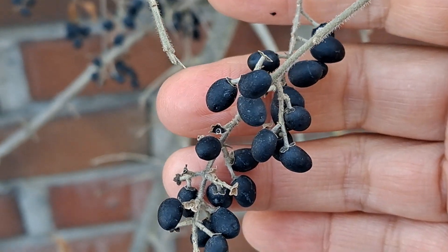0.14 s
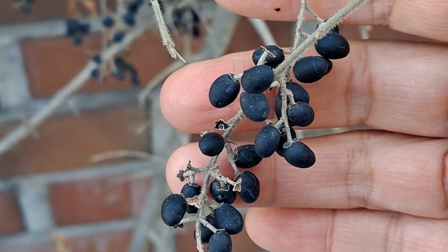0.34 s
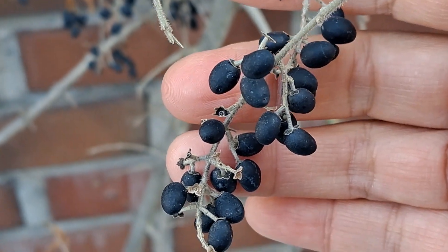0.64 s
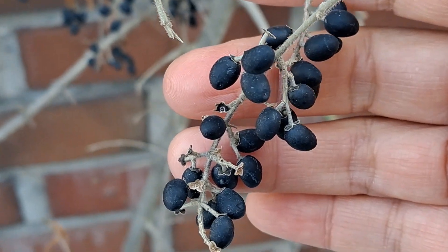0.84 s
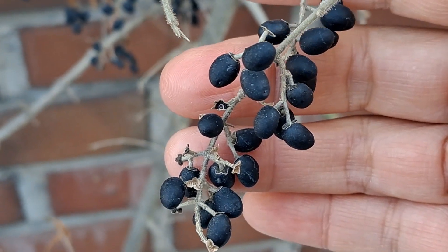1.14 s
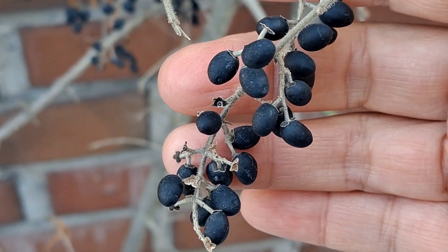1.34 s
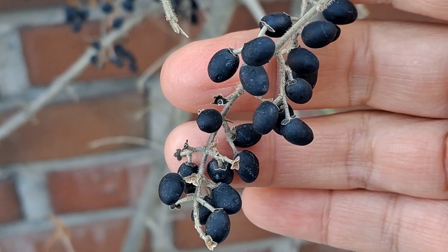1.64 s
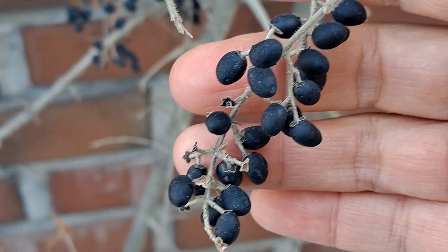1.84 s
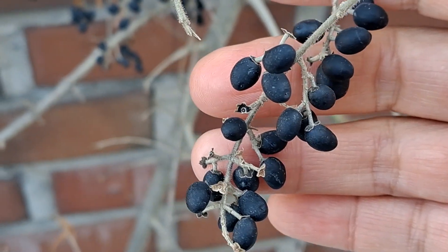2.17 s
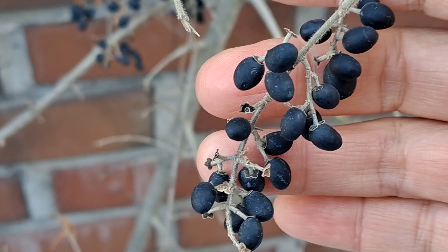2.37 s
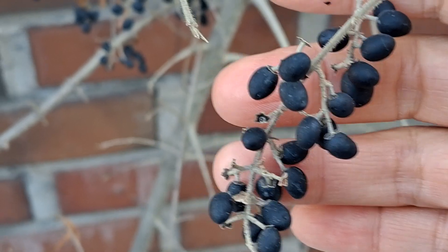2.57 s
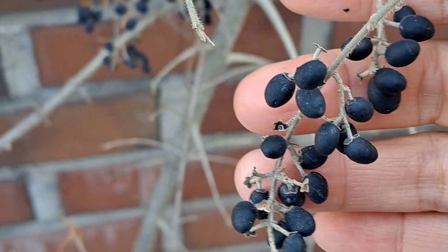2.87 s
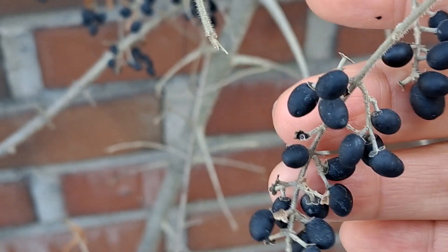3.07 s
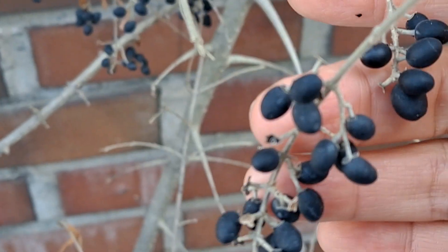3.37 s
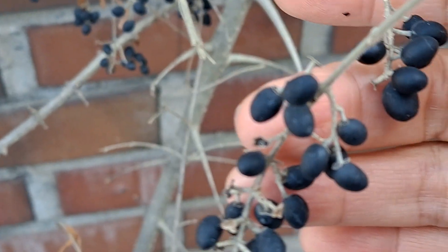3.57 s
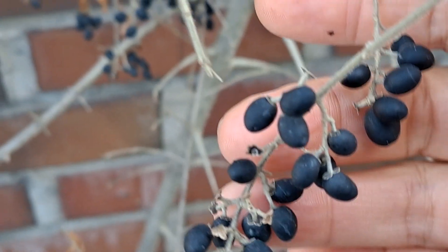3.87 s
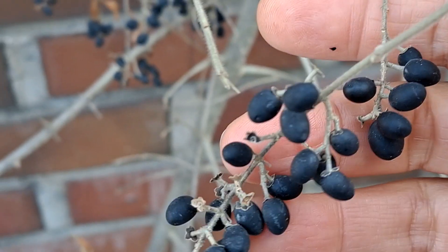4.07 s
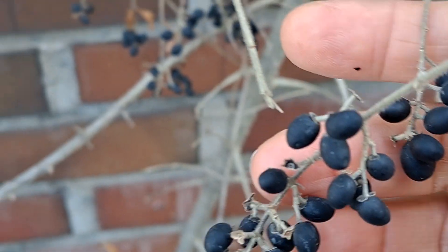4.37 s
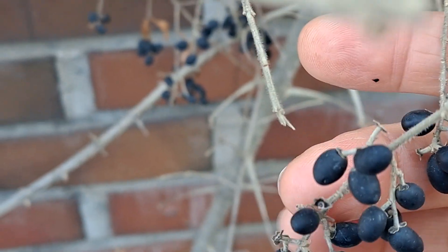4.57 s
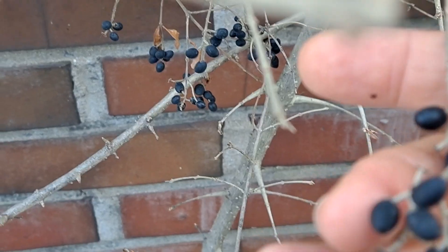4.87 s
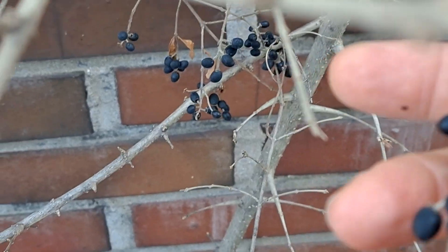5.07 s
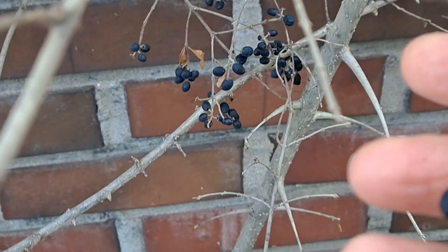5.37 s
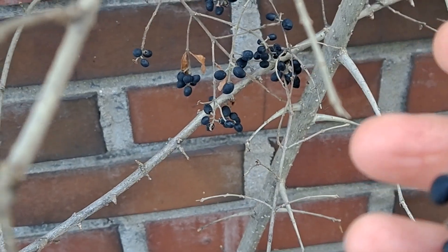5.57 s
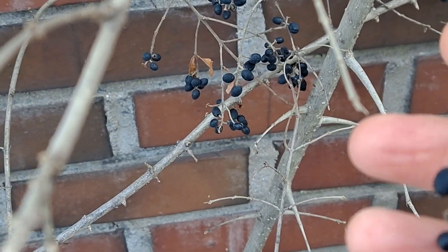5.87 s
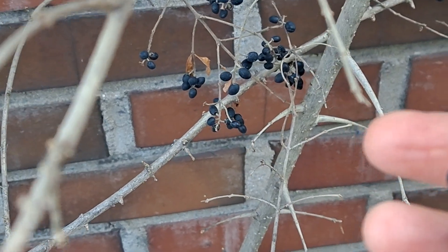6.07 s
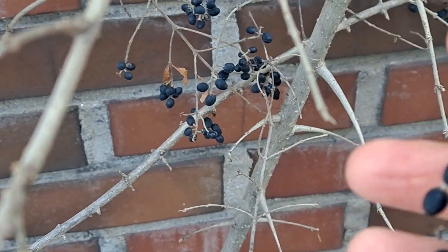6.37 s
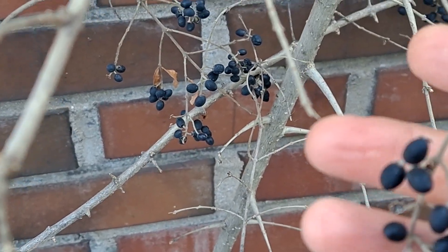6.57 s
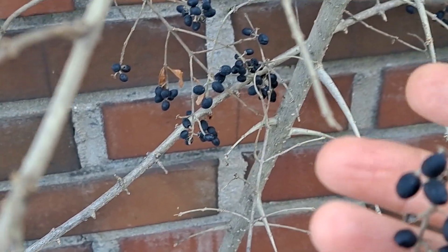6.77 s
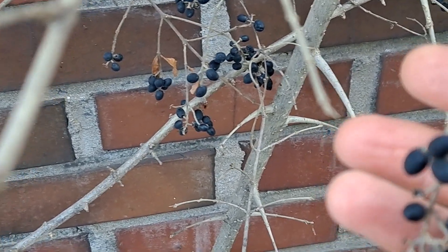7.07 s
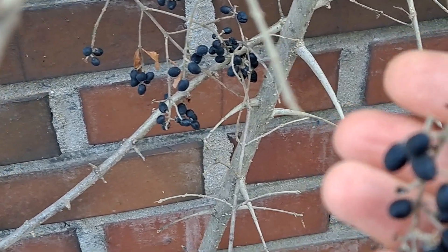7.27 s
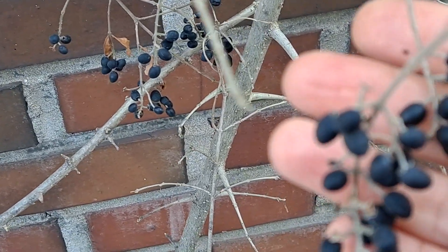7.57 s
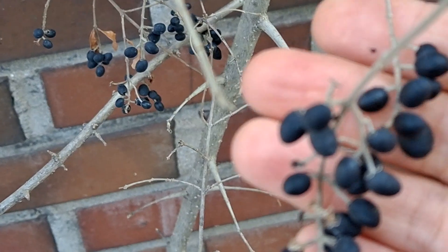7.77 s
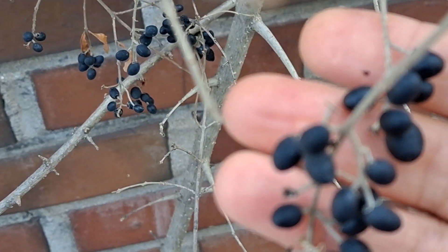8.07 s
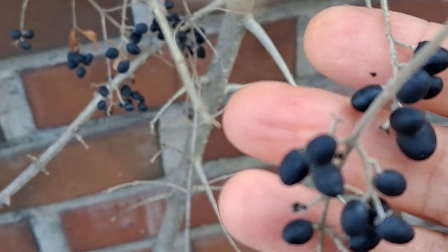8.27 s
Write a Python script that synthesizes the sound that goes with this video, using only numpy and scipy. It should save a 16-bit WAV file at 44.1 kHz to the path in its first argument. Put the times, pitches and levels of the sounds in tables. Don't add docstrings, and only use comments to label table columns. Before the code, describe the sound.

Low, steady rumble and hum of distant road traffic outdoors, with very faint high brake squeals and a few tiny dry twig ticks close by.

```python
import sys
import numpy as np
from scipy import signal
from scipy.fft import rfft, irfft, next_fast_len
from scipy.io import wavfile
from scipy.ndimage import uniform_filter1d

SR = 44100
rng = np.random.default_rng(int(sys.argv[2]) if len(sys.argv) > 2 else 0)


def boost_factor(decibels):
    exponent = np.asarray(decibels, float) / 20
    return 10 ** exponent


def dump(signal):
    limited = np.clip(np.atleast_2d(signal).T, -1, 1)
    pcm = np.round(limited * 32767).astype(np.int16)
    wavfile.write(sys.argv[1], SR, pcm)


N = 371763


def rms_one(x):
    return x / np.sqrt(np.mean(x ** 2) + 1e-30)


def in_time(rows):
    s, db = np.transpose(rows)
    return np.interp(np.arange(N) / SR, s, db)


def at_hz(points, hz):
    points = np.array(points)
    return np.interp(np.log(hz + 1), np.log(points[:, 0]), points[:, 1])


def drift(rate, size=N):
    points = 1.2 * rng.standard_normal(1700)
    return np.interp(np.arange(size) / SR * rate, np.arange(len(points)), points)


def pan(x, left_db):
    gains = boost_factor(np.array([[left_db / 2], [-left_db / 2]]))
    return x * gains * 2 / gains.sum()


def add(out, start, sound):
    at = round(start * SR)
    out[:, at:at + sound.shape[1]] += sound[:, :N - at]


def colour(x, points, shares):
    size = next_fast_len(N, True)
    curve_db = at_hz(points, np.arange(size // 2 + 1) * SR / size)
    return irfft(rfft(x, size) * boost_factor(np.outer(shares, curve_db)), size)[:, :N]


def field(spectrum, alike, lag):
    size = next_fast_len(N, True)
    hz = np.arange(size // 2 + 1) * SR / size
    real, imaginary = rng.standard_normal((2, 2, len(hz)))
    left, own = real + 1j * imaginary
    late_left = left * np.exp(-2j * np.pi * hz * lag / SR)
    right = alike * late_left + np.sqrt(1 - alike ** 2) * own
    inside = (hz > spectrum[0][0]) & (hz < spectrum[-1][0])
    return rms_one(irfft(np.array([left, right]) * boost_factor(at_hz(spectrum, hz)) * inside, size)[:, :N])


# f/Hz, level/dB per Hz
LEAF_SPECTRUM = [(1710, -24), (2900, -6), (3150, -2.5), (3510, -13), (4300, -13.5), (5000, -10),
                 (6000, -13), (8900, -12.5), (9300, -15), (10700, -18.5), (11500, -15), (12800, -15.5),
                 (13500, -13.5), (15800, -11.5)]
# t/s, level/dB
BREEZE = [(0.0, -82.5), (1.2, -82), (3.4, -81.5), (4.0, -82), (4.7, -77), (5.6, -79.5), (7.8, -81),
          (8.43, -82.5)]


def leaves():
    level_db = in_time(BREEZE) + 6.0 + 0.5 * drift(9.3)
    return boost_factor(level_db) * field(LEAF_SPECTRUM, alike=0.057, lag=22)


# t/s, level/dB
FLOW = [(0.0, -38.5), (0.9, -38.5), (1.6, -39.5), (2.3, -38), (3.3, -38), (4.1, -37.5), (4.8, -38.5),
        (5.4, -37.5), (5.95, -38), (7.3, -38.5), (7.7, -39.5), (8.43, -38.5)]


def traffic_swing():
    flow_db = in_time(FLOW)
    return flow_db - flow_db.mean()


# f/Hz, level/dB per Hz
RUMBLE = [(13, -50), (22, -27.5), (35, -1), (48, 1.5), (63, 2.5), (86, -5.5), (110, -7.5), (140, -27),
          (240, -120)]
# t/s, level/dB of the swell
AXLES = [(0.91, 7), (1.29, 6), (1.59, 7), (2.02, 3), (2.32, 7.5), (3.12, 4), (3.45, 6), (4.37, 4),
         (4.86, 1.5), (5.96, 2), (6.24, 8), (6.9, -2.5), (7.4, 5), (7.86, 8), (8.41, 2.5)]


def rumble(swing_db):
    t = np.arange(N) / SR
    half_width_s = 0.065
    axles_db = sum(db * np.exp(-0.5 * ((t - s) / half_width_s) ** 2) for s, db in AXLES)
    return boost_factor(-42.5 + 0.8 * swing_db + axles_db) * field(RUMBLE, alike=1.0, lag=22)


# f/Hz, level/dB per Hz
DRONE = [(47, -35.5), (80, -2.5), (132, 1.5), (183, -4.5), (253, -5.5), (285, -5), (318, -5), (374, -10.5),
         (449, -14), (483, -16.5), (700, -22.5), (910, -57), (1540, -120)]


def drone(swing_db):
    return boost_factor(-40 + swing_db) * field(DRONE, alike=0.89, lag=5.9)


# f/Hz, level/dB per Hz
TYRES = [(220, -36), (380, -3.5), (448, -3.5), (477, -3), (678, -7.5), (887, -2), (1340, -10.5),
         (1720, -15), (2010, -19.5), (2770, -34), (4500, -52), (5850, -70), (9900, -120)]


def tyre_roar(swing_db):
    level_db = -46.5 + 0.9 * swing_db + 0.42 * drift(6.0)
    return boost_factor(level_db) * field(TYRES, alike=0.36, lag=22)


def engine_tone(rows, wobble_hz, flutter_db, lag):
    out = np.zeros((2, N))
    s, hz, db = np.transpose(rows)
    t = np.arange(s[0], s[-1], 1 / SR)
    hz = uniform_filter1d(np.interp(t, s, hz), round(0.15 * SR))
    fade = np.clip(np.minimum(t - t[0] + 0.024, t[-1] + 0.016 - t) / 0.17, 0, 1)
    phase = 2 * np.pi * np.cumsum(hz + wobble_hz * drift(9.0, size=len(t))) / SR
    level = np.sqrt(2) * fade * boost_factor(np.interp(t, s, db) + flutter_db * drift(7.0, size=len(t)))
    right_phase = phase - 2 * np.pi * hz * lag / SR
    add(out, t[0], level * np.sin([phase, right_phase]))
    return out


# t/s, f/Hz, level/dB
IDLE = [(0.0, 52.5, -36), (0.42, 53.1, -39.5), (2.13, 51.1, -43.5), (2.58, 57.62, -48.5), (3.87, 53, -39.5),
        (4.13, 58.83, -43.5), (4.84, 51.0, -40.5), (6.15, 50.9, -46.5), (7.18, 53.15, -40),
        (7.35, 57.3, -39.5), (7.93, 53.86, -58), (8.43, 58.9, -35)]
LORRY = [(0.0, 133, -53), (0.7, 136, -45), (1.1, 134, -46.5), (1.55, 133, -42), (2.3, 135, -47),
         (2.9, 132, -49.5), (3.4, 134, -45), (3.9, 130, -51), (4.3, 134, -44.5), (4.8, 122, -40),
         (5.15, 130, -56), (5.65, 124, -44.5), (6.0, 140, -44), (6.4, 140, -53), (6.85, 132, -47),
         (7.2, 134, -49), (7.7, 130, -47.5), (8.43, 132, -46)]
EARLY_CAR = [(0.0, 232, -49.5), (0.6, 220, -48.5), (1.3, 214.8, -48.5), (1.87, 211, -51), (2.2, 210, -49)]
PASSING_CAR = [(2.1, 245, -60), (2.399, 256, -45), (2.899, 262, -50.5), (3.4, 269, -46), (3.75, 265, -47.5),
               (3.9, 261, -51), (4.05, 260, -42), (4.7, 250, -50.5), (5.3, 244, -45.5), (5.85, 241, -46),
               (6.1, 234.4, -49.5), (6.901, 226, -43.5), (7.6, 218, -53.5), (8.43, 211, -48.5)]
VAN = [(3.8, 318, -56), (4.2, 314, -52), (4.6, 322, -52), (4.9, 320, -59), (5.1, 326, -52), (5.3, 322, -47),
       (5.7, 313, -48), (6.1, 308, -47), (6.5, 312.8, -61)]
WHINE = [(1.15, 454, -74), (1.29, 447, -46.5), (1.45, 451, -78), (1.8, 449.6, -50.5), (2.2, 450, -67.5),
         (2.47, 447, -50), (2.77, 451, -50.5), (3.1, 460, -64)]


def engines():
    out = boost_factor(-1.0) * engine_tone(IDLE, wobble_hz=2.254, flutter_db=2.2, lag=22.0)
    out += boost_factor(-2.0) * engine_tone(LORRY, wobble_hz=4.98, flutter_db=2.8, lag=5.9)
    for car in (EARLY_CAR, PASSING_CAR):
        out += boost_factor(0.5) * engine_tone(car, wobble_hz=4.54, flutter_db=2.46, lag=14.0)
    out += boost_factor(-1.2) * engine_tone(VAN, wobble_hz=4.0, flutter_db=1.1, lag=8.5)
    out += boost_factor(0.1) * engine_tone(WHINE, wobble_hz=1.55, flutter_db=1.3, lag=11.0)
    return out


# f/Hz, level/dB left over right
BRAKE_SIDE = [(3300, 10), (5500, 22), (10000, 19), (13500, 21.5)]


def squeal(out, start, length, first_hz, last_hz, width_hz, db):
    t = np.arange(min(round((length + 0.3) * SR), N - round(start * SR))) / SR
    friction = rng.standard_normal((2, 2, len(t)))
    core_band = signal.butter(2, max(width_hz, 4) / 2, fs=SR, output="sos")
    halo_band = signal.butter(1, 2.3 * width_hz + 120, fs=SR, output="sos")
    core = signal.sosfilt(core_band, friction)
    halo = signal.sosfilt(halo_band, friction[::-1])
    cos, sin = rms_one(core) + boost_factor(-8.5) * rms_one(halo)
    phase = 2 * np.pi * np.cumsum(np.interp(t, [0, length], [first_hz, last_hz])) / SR
    ringing = cos * np.cos(phase) + sin * np.sin(phase)
    already_on = start == 0
    rise = np.clip((t + already_on) / min(0.22 * length, 0.08), 0, 1)
    fall = np.exp(-np.maximum(t - 0.76 * length, 0) / min(0.22 * length + 0.022, 0.15))
    flutter = boost_factor(0.79 * drift(18.0, size=len(t)))
    add(out, start, boost_factor(db) * pan(ringing * rise * fall * flutter, at_hz(BRAKE_SIDE, first_hz)))


# start t/s, length t/s, f/Hz, level/dB
SCUFFS = [(.1, .7, 15500, -75), (2.448, 0.76, 15300, -80), (2.203, .55, 14300, -79), (0, 1.3, 14200, -83),
          (.42, 0.28, 3870, -80), (.85, .4, 14100, -78), (1.149, 0.74, 3300, -79.5),
          (1.42, .35, 13900, -84), (1.45, .3, 12030, -87), (4.68, .3, 5170, -81), (6.052, 2.1, 5980, -82.5),
          (6.27, .2, 13300, -89), (7.049, .25, 13500, -85), (7.702, .4, 15030, -79)]


def scuffs(out):
    for start, length, hz, db in SCUFFS:
        squeal(out, start, length, hz, hz, 0.081 * hz, db)


# start t/s, length t/s, f/Hz, level/dB
RINGS = [(0, 0.26, 9685, -81), (0, 1.1, 8300, -88), (0.248, 0.27, 10780, -92), (.333, 0.15, 7294, -83),
         (.5, 0.44, 10750, -76), (0.657, 0.36, 10800, -69.5), (.876, .15, 9706, -93),
         (1.28, 0.38, 10941, -66), (5.9, .12, 7150, -86), (6.29, .22, 7250, -85), (7.201, 1.3, 3070, -86),
         (7.96, .35, 7360, -91), (8.1, 0.26, 8500, -90), (0, 7.5, 3070, -89)]


def rings(out):
    for start, length, hz, db in RINGS:
        squeal(out, start, length, hz, hz, 12, db)


# start t/s, length t/s, f/Hz, level/dB
SHRIEKS = [(0, 0.2, 13900, -69.5), (0, .49, 15200, -73), (.25, 0.57, 14700, -73), (.1, .2, 5900, -86),
           (.54, .5, 10480, -94), (0.593, 0.099, 13270, -71), (.85, 0.39, 13400, -72.5),
           (1.413, 0.4, 13120, -75), (1.976, 0.16, 13100, -77), (2.101, 0.52, 13300, -77.5),
           (2.169, 0.088, 14000, -75), (2.26, 0.38, 5070, -77.5), (2.64, .3, 5090, -79),
           (2.268, .35, 6550, -83), (2.55, .15, 10750, -88)]


def shrieks(out):
    for start, length, hz, db in SHRIEKS:
        squeal(out, start, length, hz, hz * (1 + 0.012 * length), 0.016 * hz, db)


# start t/s, length t/s, upper mode's first f/Hz, level/dB
PRESSES = [
    (6.103, 0.39, 6060, -78.5),
    (6.45, 0.4, 6000, -79.5),
    (7.04, .27, 5840, -76),
    (7.685, 0.35, 5850, -76),
]


def presses(out):
    width_hz = 70.0
    for start, length, hz, db in PRESSES:
        squeal(out, start, 0.8 * length, 5705, 5755, width_hz, db)
        squeal(out, start + 0.06, length, hz, 6120, width_hz, db + 0.5)


def brakes():
    out = np.zeros((2, N))
    scuffs(out)
    rings(out)
    shrieks(out)
    presses(out)
    return out


def contact(out, white, grain, start, length, low_hz, high_hz, db, grain_db, rise):
    at = round(start * SR)
    u = np.linspace(0, 1, max(round(length * SR), 64))
    band = signal.butter(2, [low_hz, high_hz], "band", fs=SR, output="sos")
    grains = white[:, at:at + len(u)] * boost_factor(grain_db * grain[at:at + len(u)])
    hiss = rms_one(signal.sosfilt(band, grains))
    envelope = np.clip(u / rise, 0, 1) * np.clip((1 - u) / 0.4, 0, 1) ** 0.57
    add(out, start, boost_factor(db) * pan(hiss * envelope, 17.5))


# start t/s, length t/s, level/dB
SLEEVE = [
    (3.66, 0.67, -78),
    (4.2, .6, -79),
    (4.655, 0.91, -80),
    (7.3, .2, -88),
]


def sleeve(out, white, grain):
    for start, length, db in SLEEVE:
        contact(out, white, grain, start, length, 3500, 8500, db, grain_db=1, rise=0.15)


# start t/s, length t/s, low edge f/Hz, level/dB
BRUSHES = [
    (4.005, 0.062, 6500, -67.5),
    (4.52, 0.13, 6000, -71.5),
    (4.85, 0.061, 6500, -69),
    (5.567, 0.084, 4000, -72),
    (5.608, 0.12, 11000, -74),
    (6.699, 0.052, 7100, -70),
    (7.25, .06, 8000, -80),
    (7.481, .2, 12500, -77),
    (7.531, 0.083, 5500, -67.5),
    (7.92, .18, 12030, -79),
]


def brushes(out, white, grain):
    for start, length, low_hz, db in BRUSHES:
        contact(out, white, grain, start, length, low_hz, 15500, db, grain_db=1.5, rise=0.15)


# t/s, low edge f/Hz, high edge f/Hz, level/dB
TICKS = [
    (3.853, 3200, 13500, -61.5),
    (3.995, 7300, 8760, -69),
    (4.503, 6000, 14500, -69),
    (4.793, 3500, 9000, -68),
    (5.158, 4000, 15100, -70),
    (5.305, 3500, 7000, -77),
    (5.585, 4000, 13000, -67),
    (5.603, 6640, 15800, -62),
]


def ticks(out, white, grain):
    for start, low_hz, high_hz, db in TICKS:
        contact(out, white, grain, start, 0.0067, low_hz, high_hz, db, grain_db=-5, rise=0.05)


# f/Hz, level/dB
CONTACT_COLOUR = [(3000, 3), (5000, 4), (5900, -2), (6900, 3.5), (8800, -2), (10800, -5), (13500, -3), (16000, 0)]


def hand():
    out = np.zeros((2, N))
    white, grain = rng.standard_normal((2, N)), drift(120.0)
    sleeve(out, white, grain)
    brushes(out, white, grain)
    ticks(out, white, grain)
    return colour(out, CONTACT_COLOUR, [1, 1])


# f/Hz, level/dB left over right
PORTS = [(60, 4.5), (110, 4), (200, 3), (380, 3.5), (700, 4.5), (1290, 4), (2380, 13), (4400, 10),
         (8120, 13), (15000, 4.5)]


def ports(x):
    return colour(x, PORTS, [0.5, -0.5])


def scene():
    swing_db = traffic_swing()
    road = rumble(swing_db) + drone(swing_db) + tyre_roar(swing_db)
    return ports(leaves() + road + engines()) + brakes() + hand()


def band_limit(x):
    return signal.sosfilt(signal.butter(12, 16870, fs=SR, output="sos"), x)


def record(dry):
    bass_cut = signal.butter(2, 34.0, "high", fs=SR, output="sos")
    top_cut = signal.ellip(16, 0.5, 60, 15750, fs=SR, output="sos")
    mix = signal.sosfilt(np.vstack([bass_cut, bass_cut, bass_cut, top_cut]), dry)
    return band_limit(mix)


dry = scene()
out = record(dry)
dump(out)
```